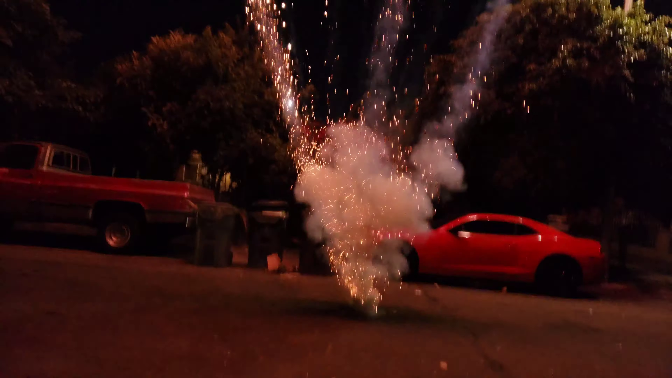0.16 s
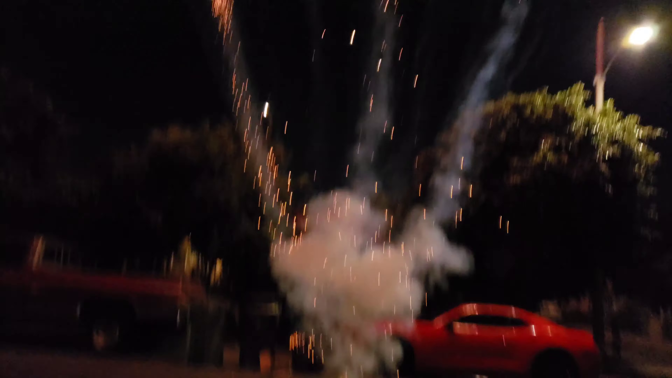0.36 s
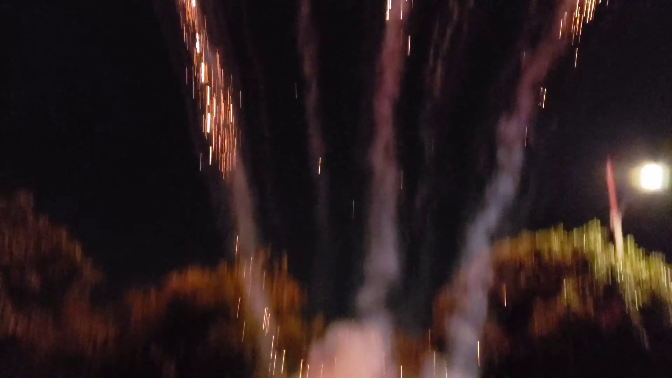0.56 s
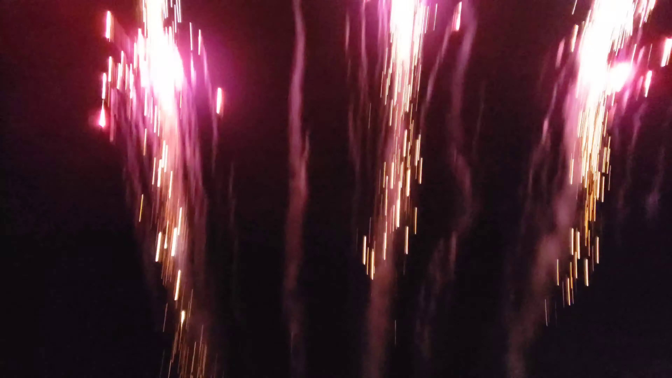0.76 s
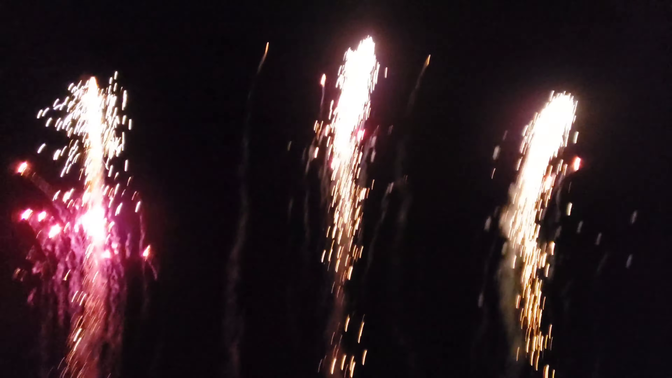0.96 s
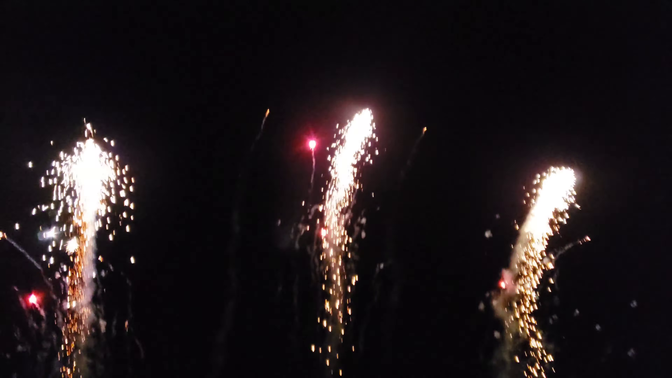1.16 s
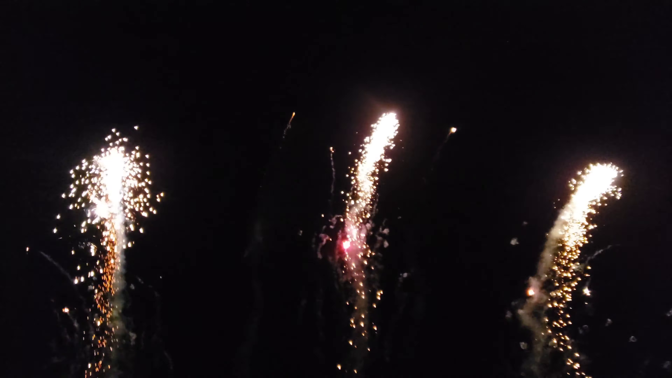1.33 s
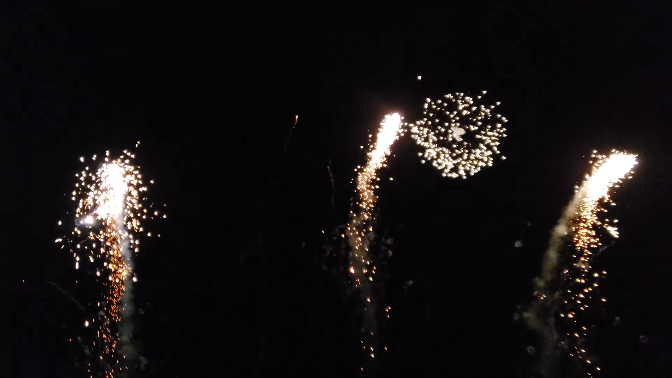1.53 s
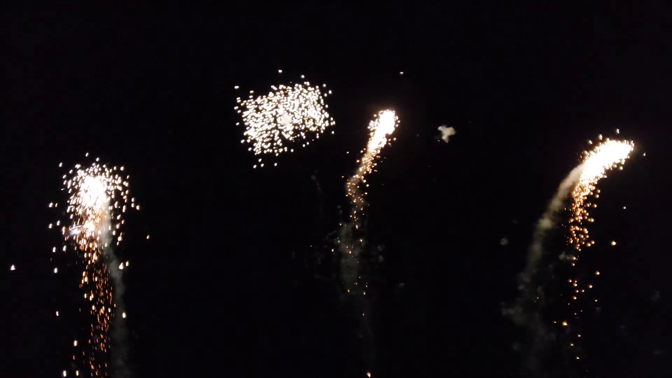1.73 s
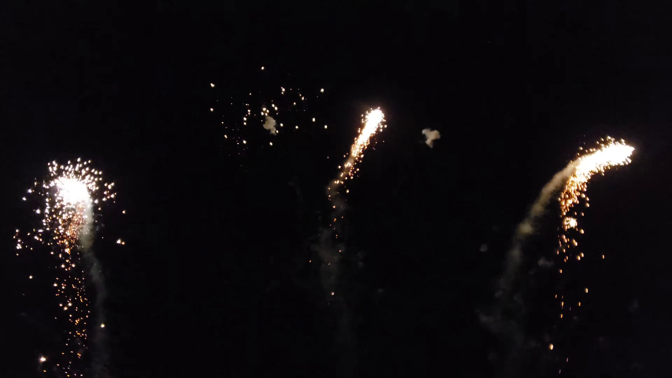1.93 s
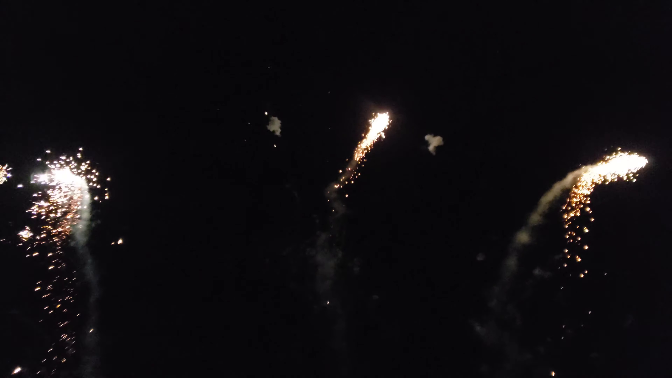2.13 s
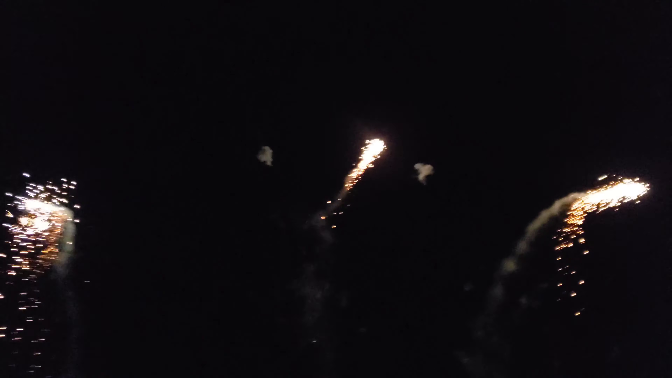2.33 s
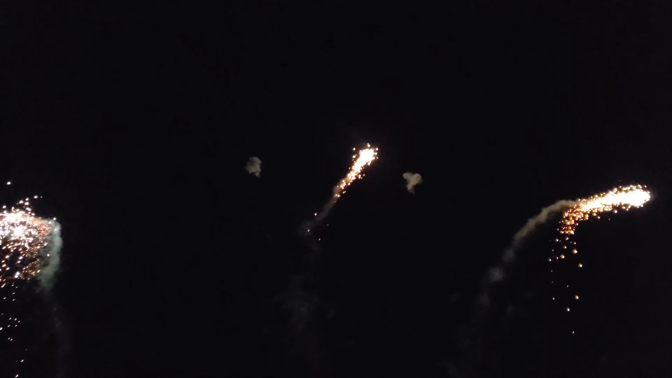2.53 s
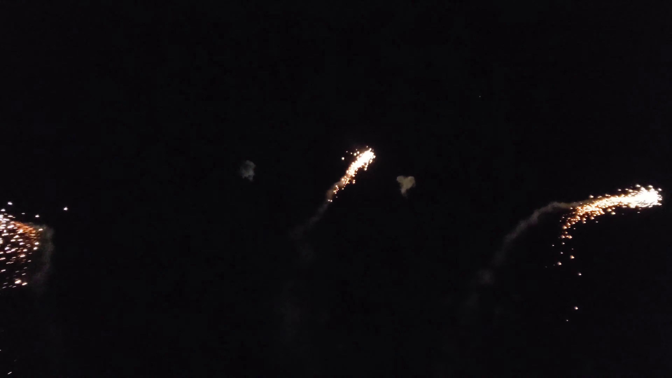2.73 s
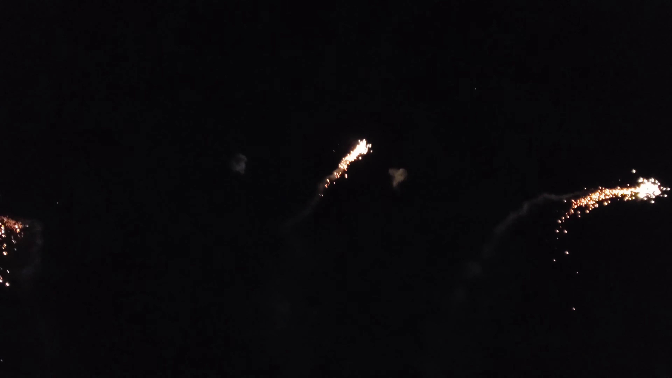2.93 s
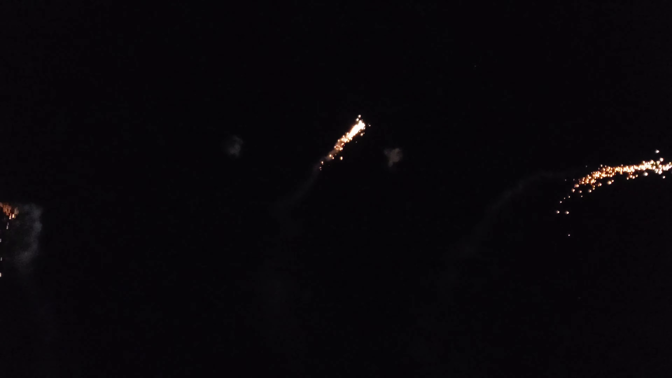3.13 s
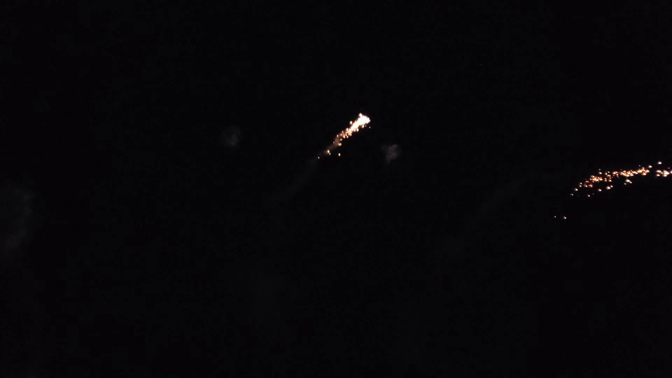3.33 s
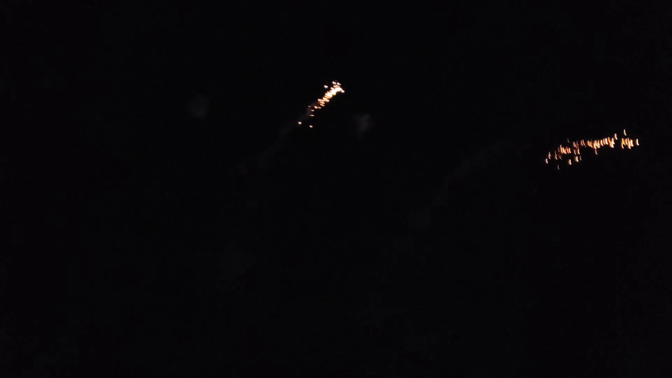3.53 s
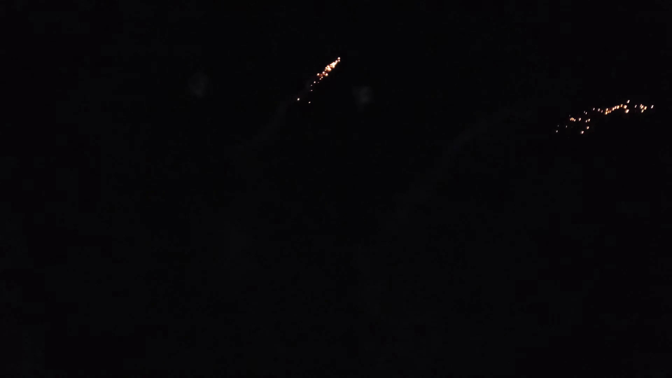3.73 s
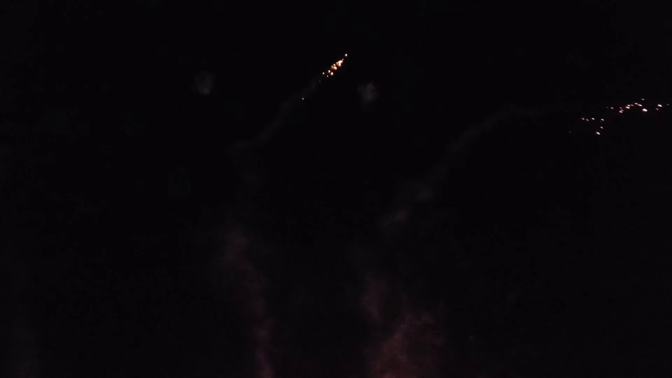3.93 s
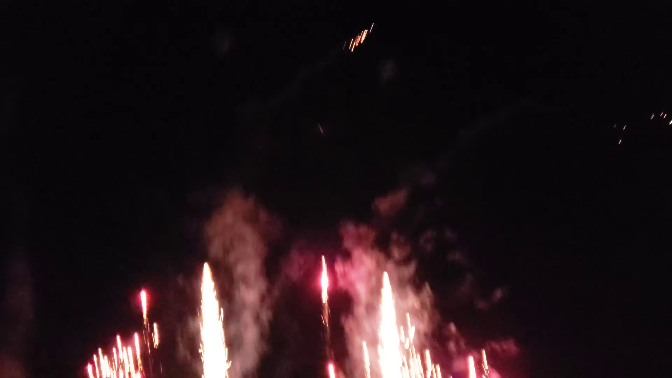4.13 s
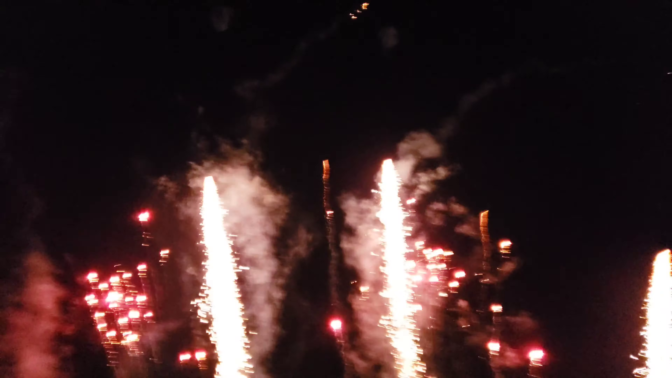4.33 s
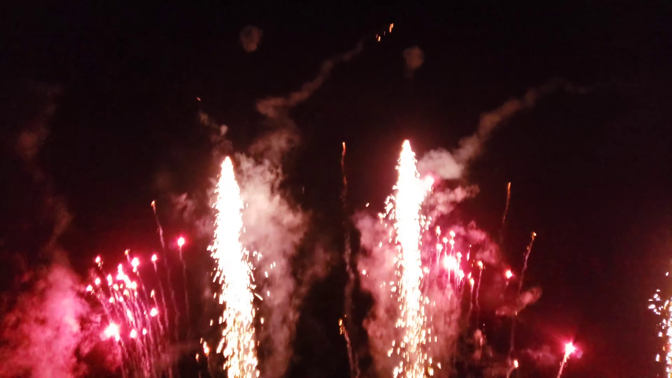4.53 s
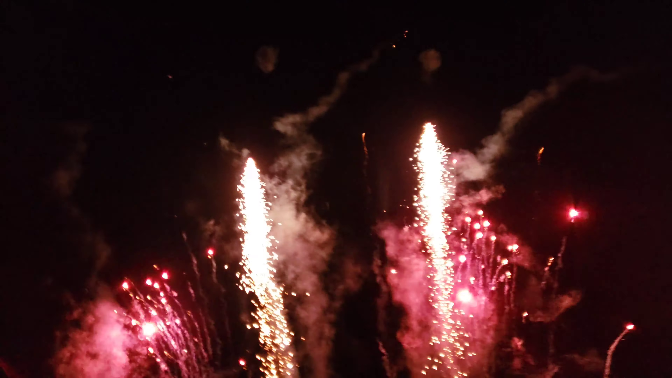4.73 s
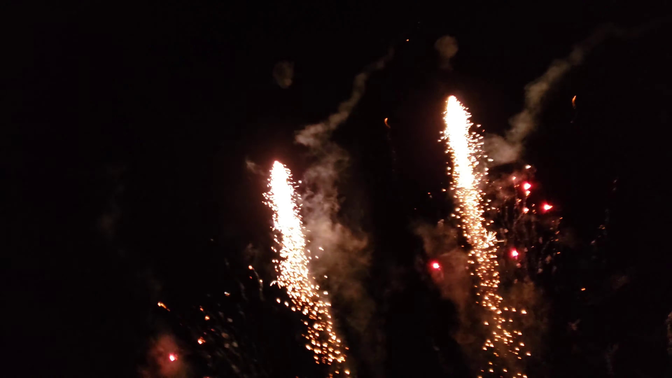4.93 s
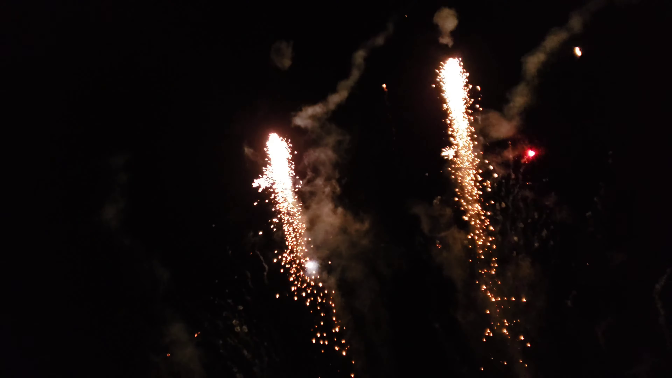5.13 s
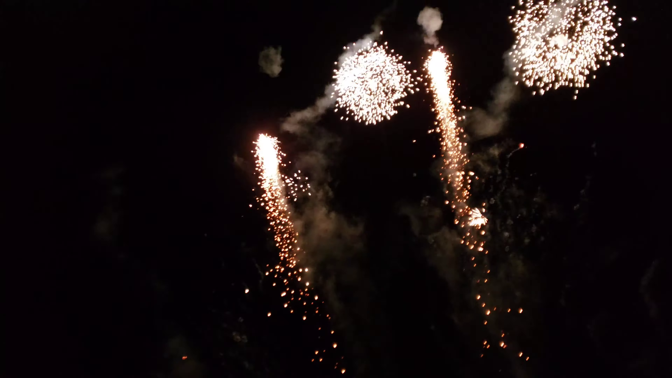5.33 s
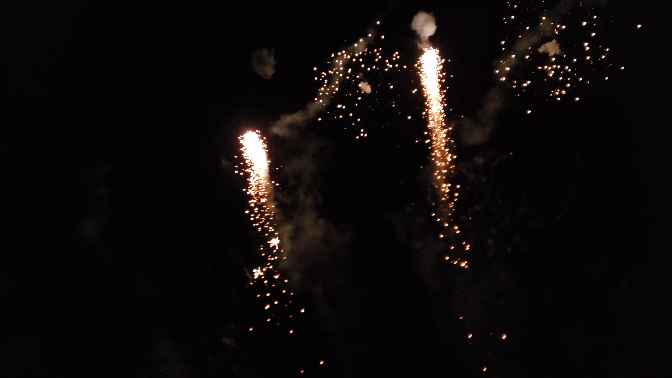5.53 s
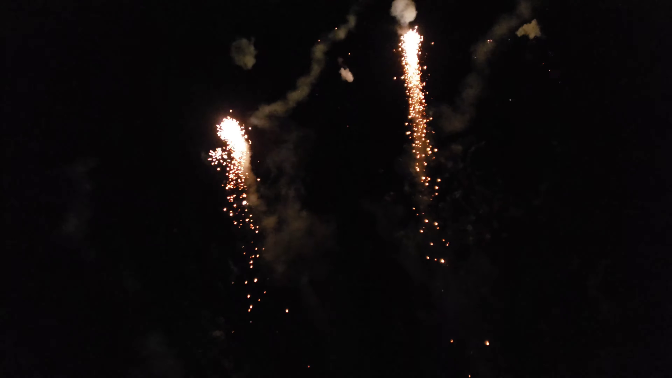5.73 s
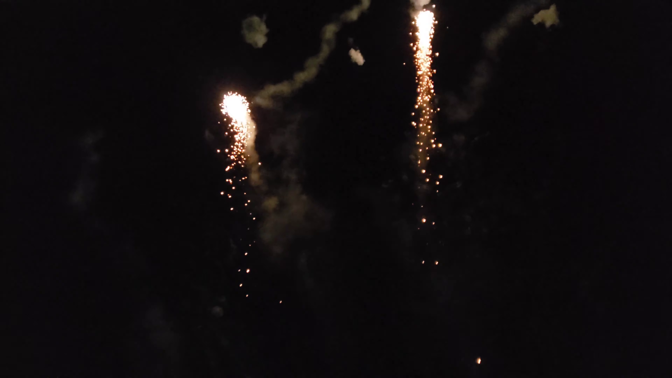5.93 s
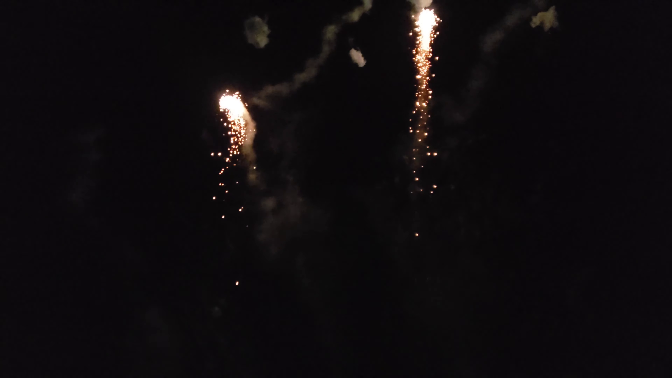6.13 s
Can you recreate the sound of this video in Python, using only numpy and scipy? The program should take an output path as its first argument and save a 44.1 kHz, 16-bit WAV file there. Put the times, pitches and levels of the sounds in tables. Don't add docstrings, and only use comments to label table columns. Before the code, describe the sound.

Close firework launch bang, sizzling crackling comets, two heavy overhead bursts, a rapid volley of launch reports, then two more bursts rolling down the street.

```python
import sys
import numpy as np
from scipy import signal
from scipy.io import wavfile
from scipy.ndimage import uniform_filter1d

SR = 44100
rng = np.random.default_rng(int(sys.argv[2]) if len(sys.argv) > 2 else 0)


def gain_from_db(level_db):
    decades = np.asarray(level_db, float) / 20
    return 10 ** decades


def store_wav(level_fs):
    pcm = np.round(np.clip(np.atleast_2d(level_fs), -1, 1) * 32767)
    wavfile.write(sys.argv[1], SR, pcm.T.astype(np.int16))


N = 272097

# (frequency [Hz], density [dB per Hz])
NIGHT = [(18, -43), (30, -10), (64, 9.5), (112, 2), (174, -37), (437, -18.5), (801, -14), (4530, -16),
         (16000, -43.5)]
# (frequency [Hz], near level [dB per Hz],
# near decay t60 [s], far level [dB per Hz], far decay t60 [s], left-right likeness [-1 to 1])
BURST_ROLL = [(50, -1.5, 0.26, -20.5, 2.7, 0.79), (150, -5, 0.66, -14.5, 1.23, 1),
              (383, -2, 0.69, -18.5, 1.64, 0.63), (1030, -16.5, 0.31, -23.5, 1.37, 0.1),
              (2880, -23.5, 0.65, -25.5, 0.92, 0.039), (10300, -35, 0.58, -41, .6, .05)]
LAUNCH_ROLL = [(48, -22, 0.16, -19.5, 1.4, 0.58), (154, -6, 0.2, -10, 0.71, 1),
               (400, -5, 0.5, -18.5, 0.58, 0.57), (927, -9.5, 0.29, -24, 0.93, 0.06),
               (2880, -15.5, 0.29, -27, 0.73, 0.036), (11800, -30, 0.38, -45, 1, .05)]
BURST_ROLL_DB = [-2.5, -2, -1.5, -6.5]
LAUNCH_ROLL_DB = [-35, -37.5, -4.5, -2, -9, -3.5, -7]
# (delay [ms], left level [dB], right level [dB])
SLAPS = [(9.65, 1.5, 4.5), (15.23, 1, 6), (21.6, -4, -10.5), (33.8, -2.5, -3.5), (36.2, -2, -10),
         (50.4, -12.5, -15.5), (64, -14, -18.5)]
VOLLEYS_S = [0, 3.76]
# (time [s], vigour as hiss level [dB], nearness as top octave over hiss [dB])
COMETS = [(.2, -57, 8.5), (.4, -46.5, 3), (.65, -39.5, 2), (1., -37, -0.5), (1.45, -32.5, -1.5),
          (2.05, -33.5, -4), (2.45, -35.5, -5), (2.65, -43.5, -4.5), (3.03, -40.5, -5), (3.3, -48.5, -3),
          (3.58, -57.5, -7), (3.74, -66.5, -4), (4.15, -53.5, 5), (4.37, -43, 0.5), (4.6, -37.5, 1),
          (5.3, -36.5, 0.5), (5.75, -43.5, -0.5), (6.17, -39.5, -1)]
# (time [s], peak [dB], left over right [dB], thump over crack [dB])
POPS = [(.1884, -32, 0, 0), (.2502, -35, 2, 2), (.3994, -35, 1, 0), (.5964, -29, 3, -4), (.8074, -27, 1, 0),
        (.9626, -25, 1.5, 0), (1.1412, -25, 2.5, 2), (1.3283, -23, 2, 2), (1.453, -23, 3, 2),
        (2.119, -25, 0, -3), (2.2806, -30, 0, -3), (2.3824, -27, 2, 0), (2.4482, -27, 2, -3),
        (2.6333, -28, 2, -3), (2.6607, -28, 2, -3), (2.7326, -28, 2, -2), (2.7545, -28, 1, -6),
        (2.8189, -26, 2, -3), (2.8248, -27, -4, -3), (2.9231, -30, 2, -2), (3.0593, -29, 1, -3),
        (3.1726, -20, 2, 2), (3.2718, -24.5, 2, 0), (3.3427, -28, 4, -3), (3.3476, -26, -1, -2),
        (3.3791, -31, 2, 0), (3.5043, -26, 2, 1), (3.5672, -34, 0, 0), (3.7413, -40, 4, -4),
        (4.3768, -30, 2, -3)]
# (time [s], peak [dB], length [ms], left crest [0-1], left swell [ratio])
LAUNCHES = [
    (.0149, -2.5, 1.1, .9, .05),
    (3.7558, -18, .7, .9, .1),
    (3.760, -6, 1.7, .8, 1.7),
    (3.8083, -6, 1.8, .8, 1.0),
    (3.8433, -5, 1.7, .9, .5),
    (3.876, -7, 1.8, .2, 3.6),
    (3.9163, -5.5, 1.9, .9, .15),
]
# (time [s], peak [dB], length [ms], left crest [0-1], left swell [ratio])
BURSTS = [
    (1.4875, -2, 1.55, .5, .6),
    (1.7533, -1.5, 1.6, 1.05, .15),
    (5.3328, -2, 1.6, .1, .6),
    (5.3877, -2.5, 1.45, .9, .1),
]
# (delay [ms], highest peak [dB], least loss [dB], length [ms], left crest [0-1])
LAUNCH_ECHOES = [(13.4, -12, 4, 1.6, .3), (17.3, -11, 4, 3.2, 1.05)]
BURST_ECHOES = [(11.7, -2.5, 0, 1.55, 1.07), (29.2, -17, 10, 1.3, .6)]
# (resonance [Hz], width [Hz], left level [dB], right level [dB])
PORTS = [(1990, 900, -4, -2.5), (3500, 5800, 4.5, 1), (8150, 2400, -9, -13), (11800, 27000, 2, 3.5),
         (14500, 5000, -5, 2)]


def in_time(rows):
    s, *columns = np.transpose(rows)
    return [np.interp(np.arange(N) / SR, s, c) for c in columns]


def rms_one(x):
    return x / np.sqrt(np.mean(x ** 2) + 1e-20)


def band(x, low_hz, high_hz):
    sos = signal.butter(2, [low_hz, min(high_hz, .45 * SR)], "band", fs=SR, output="sos")
    return signal.sosfilt(sos, x)


def peak(x, hz, width_hz, db):
    w, a = 2 * np.pi * hz / SR, gain_from_db(db / 2)
    k = np.sin(w) * width_hz / hz / 2
    turn = -2 * np.cos(w)
    return signal.lfilter([1 + k * a, turn, 1 - k * a], [1 + k / a, turn, 1 - k / a], x)


def drift(rate_hz):
    r = np.exp(-2 * np.pi * rate_hz / SR)
    wander = signal.lfilter([1], [1, -2 * r, r * r], rng.standard_normal(N + SR))
    return rms_one(wander[SR:])


def stereo_bands():
    edges = 30 * 2 ** np.arange(0, 9.6, .5)
    white = rng.standard_normal((2, 2, N))
    return [(np.sqrt(lo * hi), band(white[k % 2], lo, hi))
            for k, (lo, hi) in enumerate(zip(edges, edges[1:]))]


def spread(pair, alike):
    alike = np.clip(alike, -1, 1)
    return np.sqrt(1 + alike) * pair[0] + np.sqrt(1 - alike) * pair[1] * [[1], [-1]]


def night(bands):
    hz, db = np.transpose(NIGHT)
    hum = 0
    for centre, pair in bands:
        level_db = np.interp(np.log(centre), np.log(hz), db)
        hum = hum + spread(np.roll(pair, SR, axis=1), 300 / (300 + centre)) * gain_from_db(level_db)
    return gain_from_db(-64) * rms_one(hum)


def street(energy, table, bands):
    kicks = np.zeros(N)
    for s, db in energy:
        kicks[round(s * SR)] = gain_from_db(2 * db)
    kicks += 1e-18
    hz, *columns = np.transpose(table)
    out = 0
    for centre, pair in bands:
        near_db, near_t60, far_db, far_t60, alike = [
            np.interp(np.log(centre), np.log(hz), c) for c in columns]
        power = 0
        for db, t60 in ((near_db, near_t60), (far_db, far_t60)):
            power = power + gain_from_db(2 * db) * signal.lfilter([1], [1, -gain_from_db(-120 / t60 / SR)], kicks)
        power = signal.lfilter([.01], [1, -.99], power)
        out = out + spread(pair, alike) * np.sqrt(power)
    return out * gain_from_db(2.2 * drift(160))


def slapped(dry, haze_db, haze_t60, slap_db=0):
    t = np.arange(SR // 4) / SR
    haze = gain_from_db(haze_db - 60 * t / haze_t60) * rng.standard_normal((2, len(t)))
    echo = haze * np.clip(t / 0.045, 0, 1)
    for ms, left_db, right_db in SLAPS:
        at = round(ms * SR / 1000)
        echo[0, at] += gain_from_db(left_db + slap_db)
        echo[1, at + rng.integers(0, 10)] += gain_from_db(right_db + slap_db)
    wet = signal.fftconvolve(dry, echo, axes=1)[:, :N]
    return dry + signal.lfilter([.7], [1, -.3], wet)


def comet_laws():
    burnout_s, burnout_db_per_s, most_db = 1.88, 3.5, 2.5
    hiss_db, top_db = in_time(COMETS)
    t = np.arange(N) / SR
    age = t - np.array(VOLLEYS_S)[np.searchsorted(VOLLEYS_S, t, side="right") - 1]
    burnout_db = np.clip(burnout_db_per_s * (age - burnout_s), 0, most_db)
    rumble = 0
    for s, *_ in BURSTS:
        rumble = rumble + np.clip((t - s) / .15, 0, 1) * gain_from_db(2 * (-39 - 15 * (t - s)))
    roar_gain = np.sqrt(gain_from_db(2 * (hiss_db - 17)) + gain_from_db(2 * -57.5) + rumble)
    return hiss_db, top_db, burnout_db, roar_gain, burnout_db / most_db


def flare(burnout):
    flare_s, depth_db = .09, 9
    t, pop_s = np.arange(N) / SR, np.array([0] + [s for s, *_ in POPS])
    since = t - pop_s[np.searchsorted(pop_s, t, side="right") - 1]
    sink = np.exp(-(since / flare_s) ** 2) - 1
    return uniform_filter1d(gain_from_db(burnout * depth_db * sink), size=64)


def snap(clicks, hz):
    return band(clicks + 1e-18, hz / 2.2, hz * 2.2)


def crackle(per_s, lags):
    out = np.zeros((2, N))
    for lag, hz in zip(lags, (2600, 4200, 8000)):
        sizes = gain_from_db(3.36 * np.minimum(rng.exponential(1, N), 3)) * rng.choice([-1, 1], N)
        popping = rng.random(N) < per_s * gain_from_db(2.2 * drift(40)) / SR
        clicks = snap(sizes * popping, hz)
        out += rms_one(np.array([np.roll(clicks, -lag), clicks]))
    return rms_one(out)


def comets(bands):
    hiss_db, top_db, burnout_db, roar_gain, burnout = comet_laws()
    crackle_db = burnout_db - 2.4
    sputter = gain_from_db(1.97 * drift(23) - .9 * burnout_db)
    registers = []
    for lo, hi in ((120, 520), (520, 2000), (2000, 7500), (7500, 20000)):
        parts = [spread(p[:, ::-1], 400 / (400 + hz)) for hz, p in bands if lo < hz < hi]
        registers.append(rms_one(sum(parts)))
    roar, *hiss = registers
    grains = slapped(crackle(40, lags=(12, 9, 4)), haze_db=-46, haze_t60=.15)
    split = band(grains, 300, 1500), band(grains, 2500, 7500), band(grains, 7500, 19000)
    low, mid, top = [.7 * h * sputter + share * gain_from_db(crackle_db) * rms_one(g)
                     for h, g, share in zip(hiss, split, (.9, 1, .85))]
    trail = gain_from_db(hiss_db - 4) * (gain_from_db(-5.5) * low + mid + gain_from_db(top_db) * top)
    return trail * flare(burnout) + gain_from_db(-4.5) * roar_gain * roar


def pops():
    clicks = np.zeros((2, 2, N + 80))
    step = np.arange(24)
    for s, db, pan_db, thump_db in POPS:
        at = round(s * SR) + 48
        tear = .1 * rng.standard_normal(24) * np.exp(-step / 8) + (step == 0)
        burst = gain_from_db(db + 14.5) * tear * gain_from_db([[0], [thump_db]])
        clicks[:, 0, at - 9:at + 15] += burst * gain_from_db(pan_db / 2)
        clicks[:, 1, at:at + 24] += burst * gain_from_db(-pan_db / 2)
    crack, thump = clicks[0, :, :N] + 1e-18, clicks[1, :, :N]
    bright = band(band(crack, 2300, 6000), 1800, 17000)
    top = gain_from_db(-8) * band(crack, 6500, 13000)
    body = gain_from_db(-0.5) * snap(thump, 750)
    return slapped(bright + top + body, haze_db=-32, haze_t60=.17, slap_db=-4.5)


def echoed(reports, echoes):
    swell = 0.055
    return reports + [(s + ms / 1000, min(top_db, db - loss_db), length_ms, crest, swell)
                      for s, db, *_ in reports for ms, top_db, loss_db, length_ms, crest in echoes]


def shock(length_ms, crest, front_ms, suction, rebound):
    ms = np.arange(600) * 1000 / SR
    turns = [0, front_ms, .3 * length_ms, .75 * length_ms, length_ms, length_ms * 1.55, length_ms * 4.4]
    wave = np.interp(ms, turns, [0, crest, .6 * crest, -.8 * suction, -suction, rebound, 0])
    return uniform_filter1d(wave, size=5)


def blasts(table, front_ms, suction, rebound, grit_db, swell_hz):
    direct, swell = np.zeros((2, 2, N + 600))
    fade = np.exp(-np.arange(600) / SR / .001)
    for s, db, length_ms, crest, side in table:
        start = round(s * SR)
        at = slice(start, start + 600)
        pull = suction * min(1, 1.6 / length_ms) ** 1.5
        left = shock(length_ms, crest, front_ms, pull, rebound)
        right = shock(length_ms, 0.94, front_ms, pull, rebound)
        grit = gain_from_db(grit_db) * rng.standard_normal((2, 600)) * fade
        direct[:, at] += gain_from_db(db) * (np.array([left, right]) + grit)
        swell[:, at] += gain_from_db(db) * side * np.minimum(right, 0) * [[1], [.15]]
    swell = -4 * band(swell, swell_hz / 1.8, swell_hz * 1.8)
    return (direct + swell)[:, :N]


def launches():
    return blasts(echoed(LAUNCHES, LAUNCH_ECHOES), front_ms=.1, suction=0.7, rebound=0.3,
                  grit_db=-8, swell_hz=35)


def bursts():
    return blasts(echoed(BURSTS, BURST_ECHOES), front_ms=.2, suction=1.35, rebound=.14,
                  grit_db=-21, swell_hz=51)


def scene():
    bands = stereo_bands()
    other = [(hz, np.roll(p, 2 * SR, axis=1)) for hz, p in bands]
    burst_energy = [(s + 0.013, db) for (s, *_), db in zip(BURSTS, BURST_ROLL_DB)]
    launch_energy = [(0, -4.5)]
    launch_energy += [(s + 0.0011, db) for (s, *_), db in zip(LAUNCHES, LAUNCH_ROLL_DB)]
    rolls = street(burst_energy, BURST_ROLL, bands) + street(launch_energy, LAUNCH_ROLL, other)
    shots = bursts() + launches()
    return shots + rolls + comets(bands) + pops() + night(bands)


def band_limit(x):
    return signal.sosfilt(signal.butter(12, 16600, fs=SR, output="sos"), x)


def record(dry):
    x = signal.sosfilt(signal.butter(2, 45.4, "high", fs=SR, output="sos"), dry)
    for hz, width_hz, left_db, right_db in PORTS:
        x = np.array([peak(x[0], hz, width_hz, left_db), peak(x[1], hz, width_hz, right_db)])
    x = signal.sosfilt(signal.cheby2(12, 60, 16500, fs=SR, output="sos"), x)
    x = x / (1 + np.abs(x) ** 6) ** (1 / 6)
    return band_limit(x)


dry = scene()
out = record(dry)
store_wav(out)
```